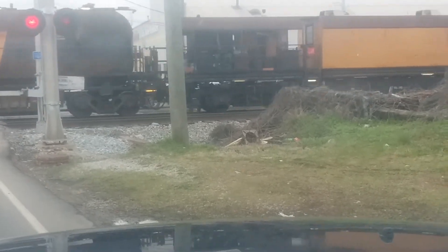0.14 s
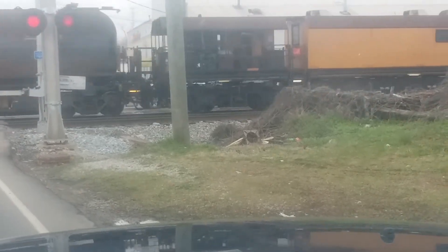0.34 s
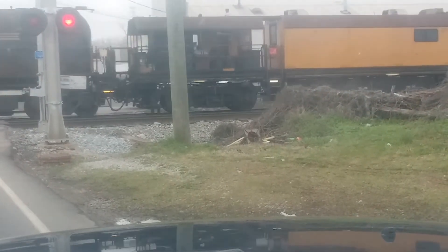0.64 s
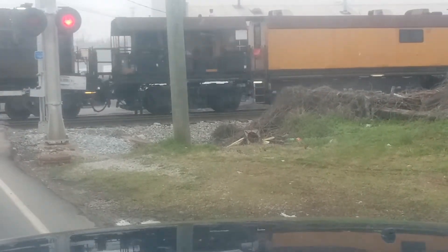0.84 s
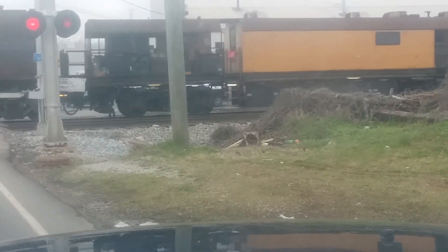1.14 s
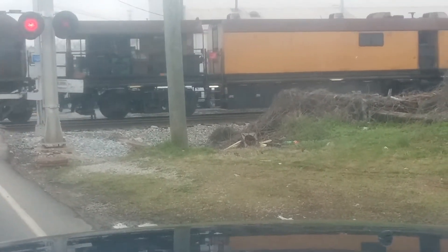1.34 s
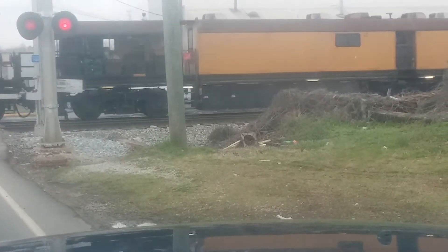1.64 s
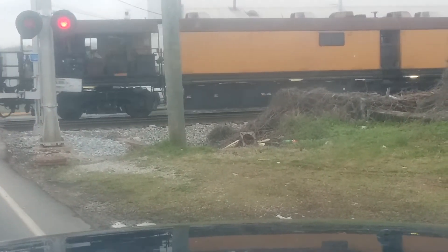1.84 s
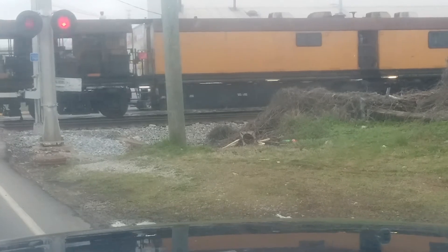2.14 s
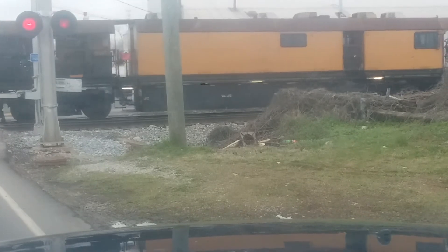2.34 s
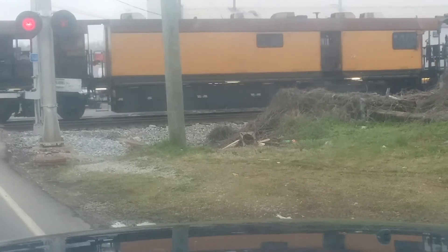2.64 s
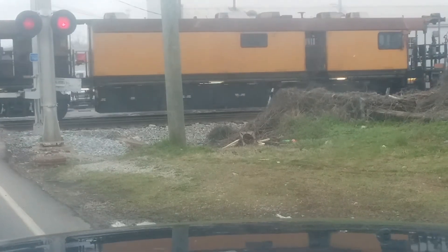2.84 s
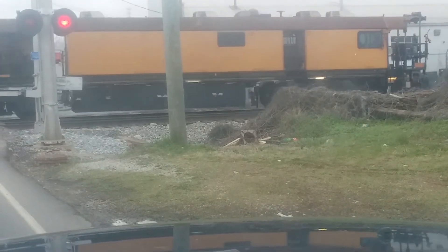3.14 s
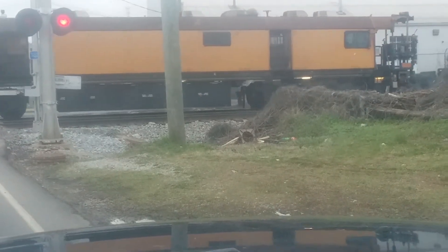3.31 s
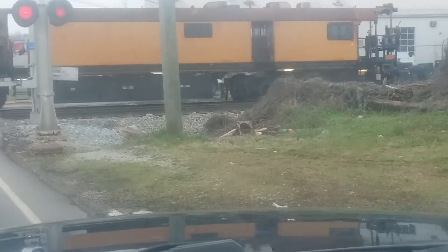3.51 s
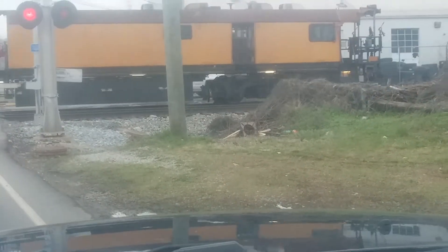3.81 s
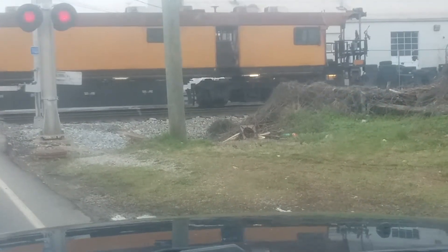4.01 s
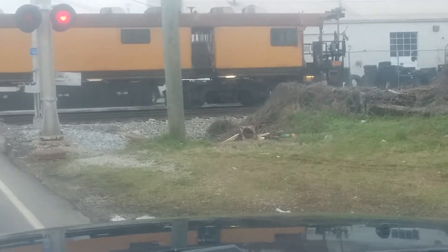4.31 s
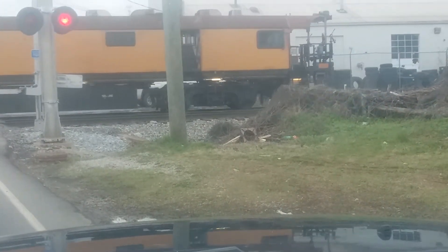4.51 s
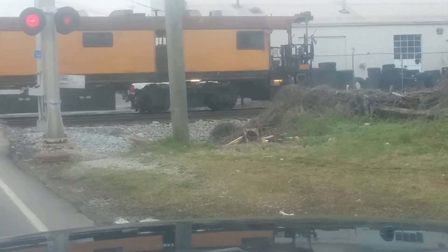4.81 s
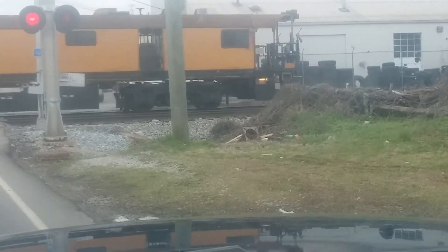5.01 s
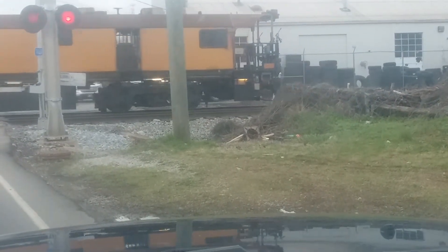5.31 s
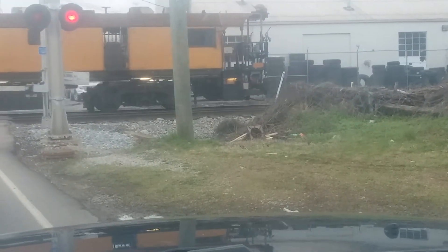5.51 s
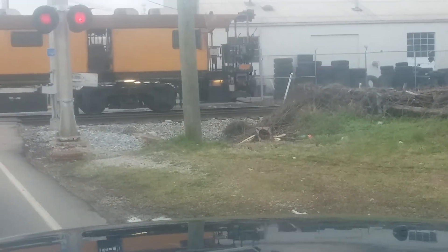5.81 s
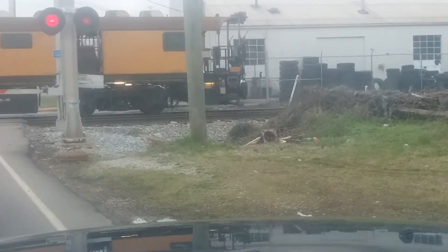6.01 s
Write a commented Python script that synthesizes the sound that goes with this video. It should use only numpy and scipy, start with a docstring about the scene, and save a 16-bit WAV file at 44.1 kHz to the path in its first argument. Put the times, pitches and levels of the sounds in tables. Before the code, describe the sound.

A train rolls past with a low rumble and diesel drone, heard from inside an idling car, a crossing bell faintly ringing.

```python
"""Inside a car that waits at a railway crossing with its engine idling, while a work train rolls by.
The train's diesels drone and throb, its fans and pumps whine, and a coupler clanks once. Its wheels
rumble and make the cabin boom, and the crossing bell barely comes through the glass.
In the car the air vent hisses, with a few faint ticks, light rubs and one clink close by.
A thin microphone hiss lies on top."""
import sys
import numpy as np
from scipy import signal
from scipy.fft import rfft, irfft, next_fast_len
from scipy.io import wavfile
from scipy.ndimage import uniform_filter1d

SR = 44100
rng = np.random.default_rng(int(sys.argv[2]) if len(sys.argv) > 2 else 0)


def unload_audio(sound):
    """Save the sound as a 16-bit wav file, at the path given as the first command line argument."""
    columns = np.transpose(np.atleast_2d(sound))
    # keep every value between -1 and 1, then stretch to whole-number steps
    steps = np.round(np.clip(columns, -1, 1) * 32767)
    wavfile.write(sys.argv[1], SR, steps.astype(np.int16))


N = 271207

# the nearer diesel's exhaust note, fading as it moves off: t/s, level/dB
DRONE_LEVEL = [(0, -32.5), (1.2, -31), (2.0, -32.5), (2.8, -35), (4.3, -34.5), (5.2, -37.5), (6.15, -36.5)]
# the tones in that note: multiple of the firing rate, relative level/dB
DRONE_TONES = [(1, 0.5), (2, -24), (3, -27.5)]
# a second deep exhaust note that throbs against the first: t/s, level/dB
THROB_LEVEL = [(0, -29.5), (.45, -38.5), (.72, -30.5), (1.3, -44), (1.85, -45), (2.1, -35.5), (2.9, -38),
               (3.3, -38.5), (3.95, -36), (4.6, -41), (6.15, -49.5)]
# the generator diesel's tones: multiple of the shaft speed, relative level/dB
GENERATOR_TONES = [(3, -10), (6, 0), (12, -15), (13, -12), (15, -14), (18, -14.5), (24, -19)]

# the air in the cabin, booming at its favourite pitches: f/Hz, relative level/dB
BOOM_COLOUR = [(22, -35), (36, -14), (60, -14.5), (85, -10), (105, -5), (116, 3.5), (128, 4), (145, 0),
               (168, -5.5), (220, -23), (400, -61.5)]
# wheels thump over rail joints and lift the boom: t/s, added level/dB
JOINT_THUMPS = [(.2, 3), (2.14, 9), (2.949, 9.5), (4.179, 6)]
# the car's body panels, shaken by the train: f/Hz, relative level/dB
RUMBLE_COLOUR = [(100, -10.5), (160, 7), (195, 7.5), (215, 5), (235, 5.5), (255, 5.5), (278, 4.5), (310, 0),
                 (350, -6), (500, -47.5)]
# the roar of wheels on rails: t/s, level/dB
ROAR_LEVEL = [(0, -43.5), (1.4, -44.5), (1.9, -44), (3.1, -44.5), (4.5, -44.5), (5.6, -46), (6.15, -45)]
# that roar as it sounds through the glass: f/Hz, relative level/dB
ROAR_COLOUR = [(200, -30), (320, -4.5), (355, -8), (390, -4), (440, -2.5), (500, -7.5), (570, -11.5),
               (720, -12), (800, -16), (1000, -18.5), (1200, -20), (1350, -24), (2000, -29.5),
               (5000, -83.5)]
# the growl of the passing wheel frames (bogies): t/s, level/dB
GROWL_LEVEL = [(0, -51.5), (.8, -53), (1.3, -61), (2.3, -61.5), (2.8, -57), (3.3, -62), (4.1, -64),
               (5, -59.5), (6.15, -61)]
# the pitches in that growl: f/Hz, relative level/dB
GROWL_COLOUR = [(400, -6), (490, 13.5), (530, 8.5), (610, 13), (680, 3.5), (850, -30)]

# the train's fans and pumps: f/Hz, base level/dB
FAN_TONES = [(98.5, -46), (282, -53), (389, -54), (421, -54), (461, -56), (491, -61), (582, -60),
             (1047, -70), (1072, -75), (1205, -72)]
# they come past and move off: t/s, added level/dB
FAN_PASSING = [(0, -2), (1.2, -2.5), (1.8, 1.5), (2.8, 1.5), (3.4, 0.5), (4.5, -4.5), (5.3, -3.5),
               (6.15, -6)]
# a coupler between two wagons: f/Hz, level/dB, time to fade by 60 dB/s
COUPLER_TONES = [(711, -40, .12), (790, -46, .06), (560, -45, .05)]
# the crossing bell: f/Hz, level/dB, time to fade by 60 dB/s
BELL_TONES = [(1555, -63, 1.5), (2099.5, -68, 1.4), (2250, -73, .8), (2480, -71, .7), (2685.5, -64, 1.0),
              (2855, -70, .6)]

# the car's four-cylinder engine at idle: multiple of the firing rate, level/dB
IDLE_TONES = [(1, -46.3), (1.5, -59), (1.75, -58), (2, -50.5), (2.25, -60), (2.5, -57), (2.75, -57),
              (3, -54.5), (4, -48), (5, -46)]
# air flowing from the vent: t/s, level/dB
VENT_LEVEL = [(0, -55), (.85, -55.5), (1.6, -56.5), (3.8, -56), (4.6, -56.5), (5.2, -56), (5.7, -57),
              (6.15, -57)]
# the pitches in the vent's hiss: f/Hz, relative level/dB
VENT_COLOUR = [(500, -15), (1000, -1.5), (1500, -2.5), (1950, -2), (2400, 2), (2850, 0), (3200, -5.5),
               (4000, -11.5), (5300, -19.5), (7200, -21.5), (8100, -27), (11000, -28), (16000, -30)]
# faint ticks in the cabin: t/s, peak level/dB before panning, ringing f/Hz
CABIN_TICKS = [(3.959, -60, 6500), (3.986, -57, 7050), (4.462, -59, 5660), (4.624, -59.5, 6000),
               (5.346, -55, 6250), (5.469, -55, 5700), (5.601, -56.5, 4000), (5.820, -52, 7450),
               (5.896, -51, 4770), (5.911, -53, 4600)]
# light rubs nearby: middle t/s, length/s, level/dB
LIGHT_RUBS = [(3.8, .08, -69), (3.95, 0.17, -71), (4.902, 0.34, -81), (5.5, 0.14, -74), (5.81, 0.22, -67.5),
              (6.004, 0.12, -70)]
# the pitches in the rubbing: f/Hz, relative level/dB
RUB_COLOUR = [(3000, -12), (4500, -1.5), (7300, 1), (9500, -9), (12500, -5.5), (15000, -14)]
# one small metal clink: f/Hz, level/dB, time to fade by 60 dB/s
CLINK_TONES = [(4474, -58, .045), (6045, -61, .07)]

# the microphone's own high hiss: f/Hz, relative level/dB
HISS_COLOUR = [(10800, -40), (11450, -24), (11850, -8), (12500, -8), (13200, -2), (14300, 0), (15600, -1),
               (16500, -10)]
# a thin sizzle wandering in that hiss: t/s, centre f/Hz
SIZZLE_PITCH = [(0, 14000), (1.2, 13800), (1.35, 14800), (2.75, 14200), (2.89, 13600), (3.0, 15000),
                (3.95, 14900), (4.2, 14000), (4.6, 14900), (5.12, 14750), (5.34, 13700), (5.4, 14800),
                (5.88, 13100), (6.15, 13600)]
# a faint whistle in that hiss: t/s, level/dB before panning
WHISTLE_LEVEL = [(0, -67.5), (1.0, -74), (1.3, -79.5), (6.15, -79)]
# how much louder noise is in the left ear: f/Hz, left minus right level/dB
EAR_BALANCE = [(90, -0.5), (210, 2), (500, -1), (770, 0), (1200, 1.5), (1800, 1), (2750, 8), (4200, 5),
               (6400, 7), (8500, 2), (11000, -2), (12200, 14), (14000, 10)]
# how unlike the noise is in the two ears: f/Hz, side minus mid level/dB
EAR_WIDTH = [(30, -29), (60, -49.5), (125, -27), (250, -12.5), (500, -12), (750, -7.5), (1150, -0.5),
             (1700, -0.5), (2700, -9.5), (4200, -2.5), (9000, -3.5), (14000, -5.5)]


def diesels():
    """The train's engines run at different speeds; two of their notes beat about 15 times a second."""
    drone_hz, throb_hz, shaft_hz = 133.9, 119.0, 29.47
    drone_db, = in_time(DRONE_LEVEL)
    throb_db, = in_time(THROB_LEVEL)
    drone = engine(drone_hz, DRONE_TONES, flutter_db=.8, flutter_rate=4, phase_wander=.12)
    throb = tone(throb_hz, throb_db, flutter_db=1.2, flutter_rate=2, phase_wander=.5)
    generator = engine(shaft_hz, GENERATOR_TONES, flutter_db=2.5, flutter_rate=3.7, phase_wander=.65)
    return (from_db(drone_db) * drone + throb + from_db(-44) * generator) * panned(.57)


def wheels():
    """Rolling wheels make the cabin's air boom, shake the panels, and roar and growl through the glass."""
    thumps_db = sum(db * swell(s, length=.063) for s, db in JOINT_THUMPS)
    surges_db = 1.3 * drift(rate=13)
    boom_db = fading(-33.5, db_per_s=.83) + surges_db + thumps_db  # the heavy wagons move off
    roar_db, = in_time(ROAR_LEVEL)
    growl_db, = in_time(GROWL_LEVEL)
    boom = from_db(boom_db) * steady(cabin_noise(BOOM_COLOUR), seconds=.083)
    rumble = from_db(fading(-40, db_per_s=.29)) * steady(cabin_noise(RUMBLE_COLOUR), seconds=.2)
    roar = from_db(roar_db) * steady(cabin_noise(ROAR_COLOUR), seconds=.11)
    growl = from_db(growl_db) * cabin_noise(GROWL_COLOUR)
    return boom + rumble + roar + growl


def fans_and_pumps():
    """Fans and pumps whine unevenly, loudest as their wagon goes by."""
    passing_db, = in_time(FAN_PASSING)
    return sum(tone(hz, db + passing_db, flutter_db=2.8, flutter_rate=3, phase_wander=.9)
               for hz, db in FAN_TONES)


def struck_metal(tones, at_s):
    """One blow sets all the tones of a metal part ringing."""
    click = np.zeros(N)
    click[int(at_s * SR)] = 1
    return sum(from_db(db) * ring(click, hz, fade_s) for hz, db, fade_s in tones)


def crossing_bell():
    """A clapper strikes the bell evenly; each tone reaches the two ears by different paths."""
    first_s, gap_s, rise_s = .06, .381, .0048
    since_strike = (np.arange(N) - int(first_s * SR)) / SR % gap_s
    rise = np.minimum(since_strike / rise_s, 1)
    out = np.zeros((2, N))
    for hz, db, fade_s in BELL_TONES:
        decay = from_db(-60 * since_strike / fade_s)
        for ear in out:
            level = from_db(db + 4.4 * drift(rate=2.9))
            phase = turning(hz) + 1.1 * drift(rate=3.8)
            ear += rise * decay * level * np.sin(phase)
    return out * panned(2.8)


def car_idle():
    """The car's own engine; unequal cylinders add weak tones between the main ones."""
    firing_hz = 24.12 + .037 * drift(rate=.39)
    return engine(firing_hz, IDLE_TONES, flutter_db=4, flutter_rate=1, phase_wander=.23)


def air_vent():
    """Air hisses almost evenly out of the vent."""
    vent_db, = in_time(VENT_LEVEL)
    return from_db(vent_db) * cabin_noise(VENT_COLOUR)


def ticks():
    """Each tick is a short crackle with a brief ring, off to the left."""
    out = np.zeros((2, N))
    t = np.arange(SR // 10) / SR
    band = signal.butter(3, [3000, 8000], "band", fs=SR, output="sos")
    for s, db, hz in CABIN_TICKS:
        crackle = rng.standard_normal(len(t)) * np.exp(-t / .005)
        tick = signal.sosfilt(band, ring(crackle, hz, fade_s=.0042) + 4 * crackle)
        tick *= from_db(db) / np.abs(tick).max()
        start = int(s * SR)
        out[:, start:start + len(t)] += tick[:N - start]
    return out * panned(8)


def rubbing():
    """Something rubs lightly nearby, in clumps of tiny grains."""
    level = sum(from_db(db) * swell(s, length) for s, length, db in LIGHT_RUBS)
    grains = rng.standard_normal((2, N)) * from_db(3.5 * drift(rate=90))
    size = next_fast_len(N, real=True)
    hz = np.arange(size // 2 + 1) * SR / size
    rustle = irfft(rfft(grains, size) * colour(RUB_COLOUR, hz), size)[:, :N]
    return level * rms_one(rustle) * panned(1.5)


def microphone_hiss():
    """The microphone's high hiss, with a wandering sizzle and a faint whistle at one pitch."""
    centre_hz, = in_time(SIZZLE_PITCH)
    whistle_db, = in_time(WHISTLE_LEVEL)
    low_noise = signal.sosfilt(signal.butter(2, 300, fs=SR, output="sos"), rng.standard_normal(N))
    sizzle_db = -71.5 + 2 * drift(rate=4)
    sizzle_hz = centre_hz + 80 * drift(rate=8)
    # multiplying by a sine moves the low noise up to that pitch
    sizzle = from_db(sizzle_db) * rms_one(low_noise * np.sin(turning(sizzle_hz)))
    whistle = from_db(whistle_db) * np.sin(turning(hz=14000))
    return from_db(-65.8) * cabin_noise(HISS_COLOUR) + (sizzle + whistle) * panned(11)


def engine(hz, tones, flutter_db, flutter_rate, phase_wander):
    """An engine repeats hz times a second, which makes tones at multiples of that rate."""
    return sum(tone(k * hz, db, flutter_db, flutter_rate, phase_wander) for k, db in tones)


def tone(hz, db, flutter_db, flutter_rate, phase_wander):
    """One tone that flutters in level and phase as its paths into the car change."""
    level = from_db(db + flutter_db * drift(flutter_rate))
    phase = turning(hz) + phase_wander * drift(flutter_rate)
    return np.sqrt(2) * level * np.sin(phase)


def ring(push, hz, fade_s):
    """Ringing at one pitch: a click of height 1 starts a sine that drops 60 dB in fade_s."""
    decay = from_db(-60 / (fade_s * SR))
    step = 2 * np.pi * hz / SR
    return signal.lfilter([0, np.sin(step)], [1, -2 * decay * np.cos(step), decay ** 2], push + 1e-18)


def cabin_noise(spectrum):
    """Noise of a given colour, alike in both ears in the bass and more spread out higher up."""
    size = next_fast_len(N, real=True)
    hz = np.arange(size // 2 + 1) * SR / size
    mid, side = rfft(rng.standard_normal((2, size)))  # mid is shared, side is opposite in each ear
    width = from_db(at_hz(EAR_WIDTH, hz))
    ears = (mid + width * side * [[1], [-1]]) / np.sqrt(1 + width ** 2)
    shaped = ears * panned(at_hz(EAR_BALANCE, hz)) * colour(spectrum, hz)
    return rms_one(irfft(shaped, size)[:, :N])


def steady(noise, seconds):
    """Even out the strength of a noise over spans longer than the given time."""
    power = uniform_filter1d(np.mean(noise ** 2, axis=0), max(int(seconds * SR), 1))
    return noise / np.sqrt(power + 1e-12)


def colour(spectrum, hz):
    """How strong each pitch is; beyond the table's ends it drops 20 dB an octave."""
    hz = np.maximum(hz, 1)
    octaves_outside = np.abs(np.log2(hz / np.clip(hz, spectrum[0][0], spectrum[-1][0])))
    return from_db(at_hz(spectrum, hz) - 20 * octaves_outside)


def drift(rate):
    """A smooth random wobble of typical size 1; a higher rate (Hz) wobbles faster."""
    hop, warm_up = 40, 2000  # samples per step, steps thrown away
    memory = np.exp(-2 * np.pi * rate * hop / SR)
    noise = rng.standard_normal(N // hop + warm_up + 2)
    slow = signal.lfilter([1], [1, -2 * memory, memory ** 2], noise)[warm_up:]
    return np.interp(np.arange(N) / hop, np.arange(len(slow)), rms_one(slow))


def turning(hz):
    """The angle (phase) of something that turns hz times a second, from a random start."""
    return 2 * np.pi * (np.cumsum(hz * np.ones(N)) / SR + rng.random())


def swell(s, length):
    """A smooth rise to 1 and fall again, around second s."""
    return np.exp(-(2 * (np.arange(N) / SR - s) / length) ** 2)


def fading(db, db_per_s):
    """A level in dB that sinks evenly."""
    return db - db_per_s * np.arange(N) / SR


def in_time(rows):
    """Join a table's points in time with straight lines, one value per sample."""
    s, *columns = np.transpose(rows)
    return [np.interp(np.arange(N) / SR, s, column) for column in columns]


def at_hz(points, hz):
    """Read between a table's pitches, giving each octave equal room."""
    f, value = np.transpose(points)
    return np.interp(np.log(np.maximum(hz, 1)), np.log(f), value)


def panned(pan_db):
    """Left and right gains that make the left ear louder by pan_db."""
    return from_db(np.array([[.5], [-.5]]) * pan_db)


def from_db(db):
    """Turn decibels into a number to multiply by."""
    return 10 ** (np.asarray(db) / 20)


def rms_one(x):
    """Scale a signal to an average strength (rms) of 1."""
    return x / np.sqrt(np.mean(np.abs(x) ** 2) + 1e-20)


def scene():
    """The train and bell outside, the car around the listener."""
    train = diesels() + fans_and_pumps() + wheels() + struck_metal(COUPLER_TONES, at_s=4.596)
    bell = crossing_bell()
    car = car_idle() + air_vent() + ticks() + rubbing() + struck_metal(CLINK_TONES, at_s=5.214)
    return train + bell + car + microphone_hiss()


def record(dry):
    """Fade in very quickly and cut off the highest treble."""
    fade_in_s, cutoff_hz = .002, 15800
    fade_in = np.minimum(np.arange(N) / (fade_in_s * SR), 1)
    treble_cut = signal.ellip(12, .1, 90, cutoff_hz, fs=SR, output="sos")
    return signal.sosfilt(treble_cut, dry * fade_in)


dry = scene()
out = record(dry)
unload_audio(out)
```